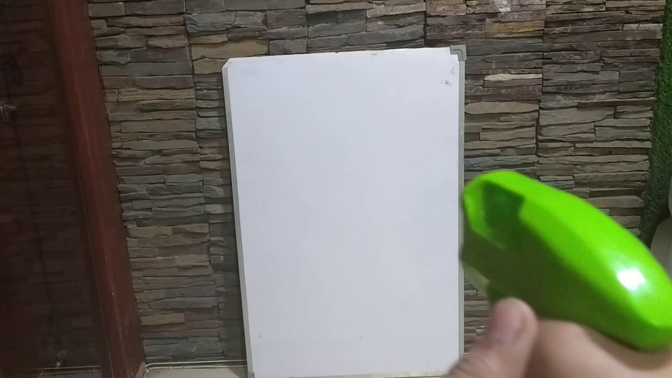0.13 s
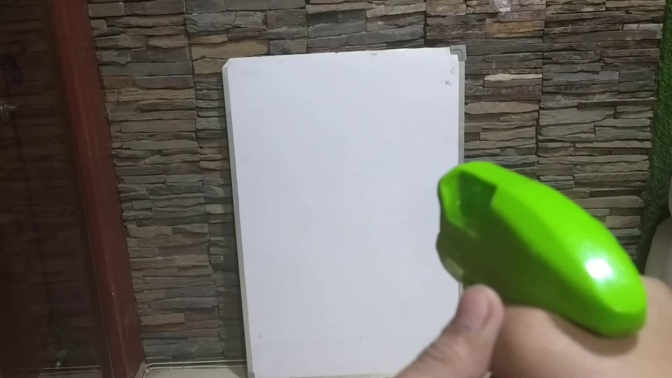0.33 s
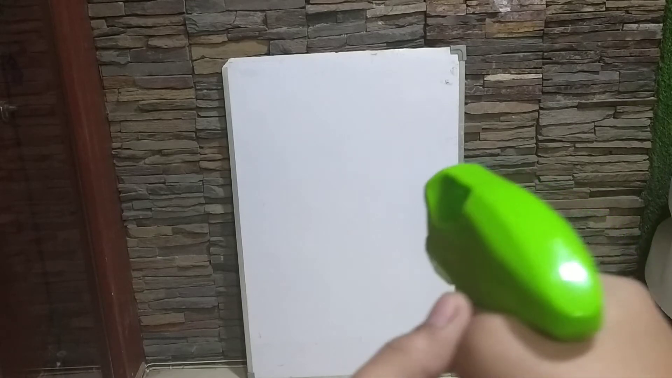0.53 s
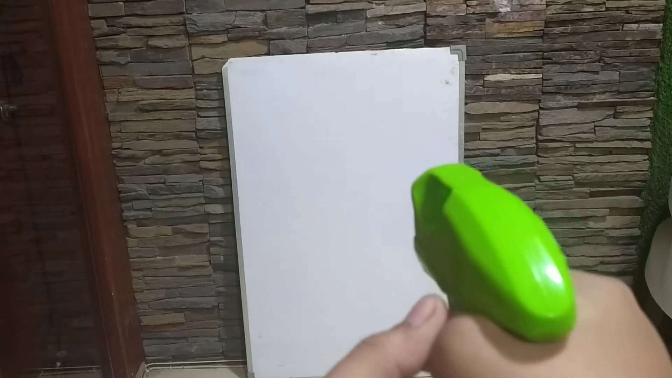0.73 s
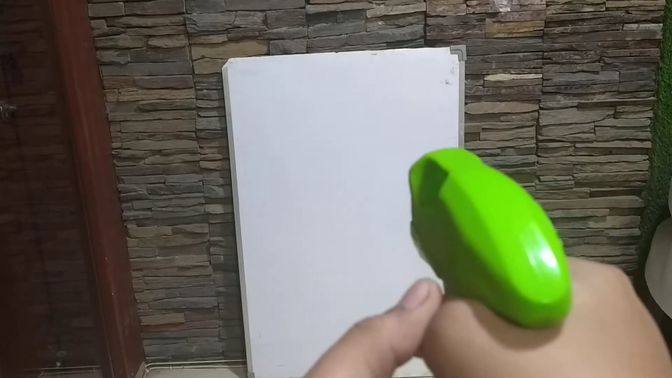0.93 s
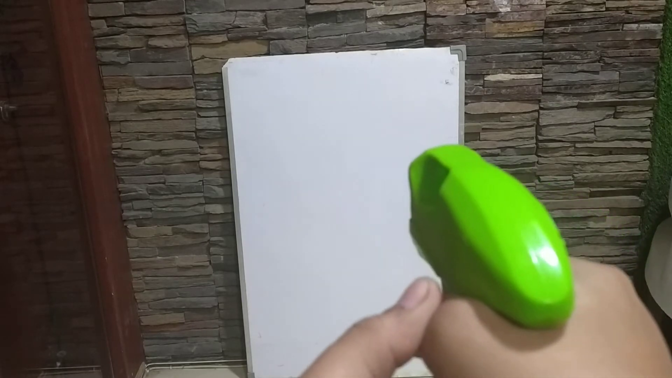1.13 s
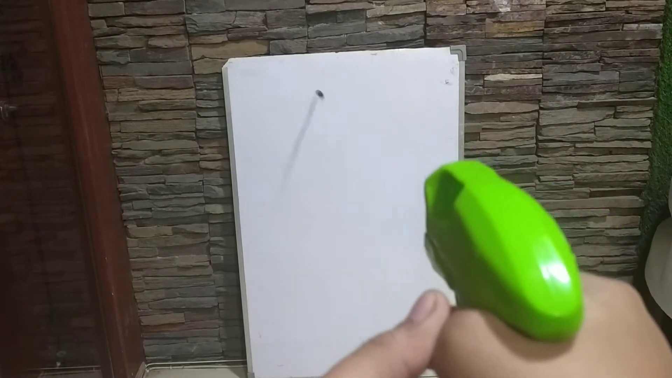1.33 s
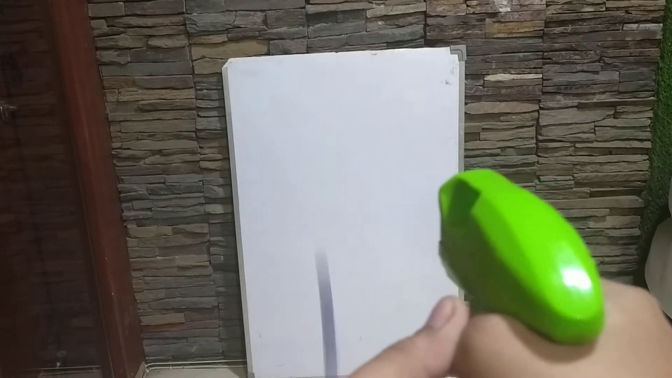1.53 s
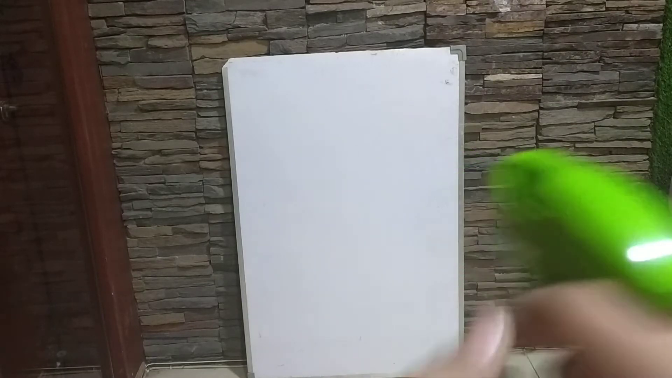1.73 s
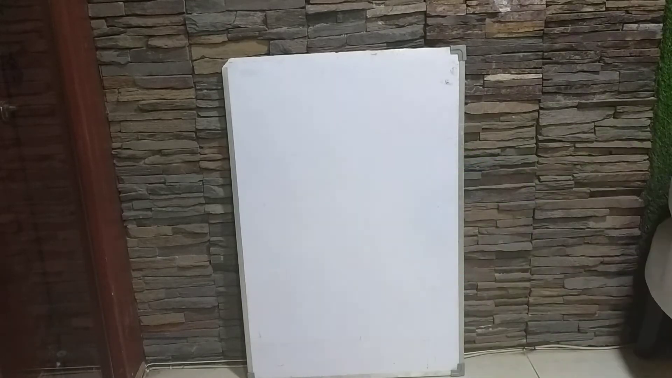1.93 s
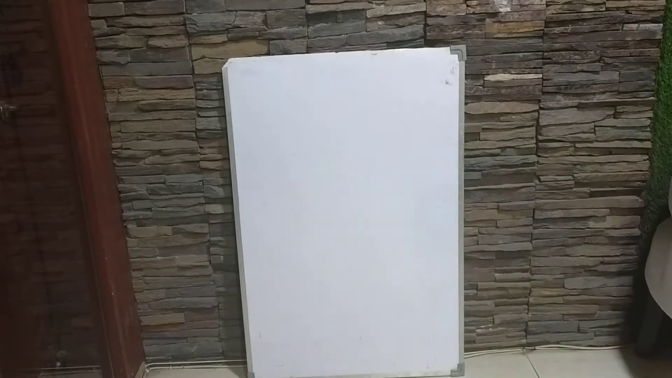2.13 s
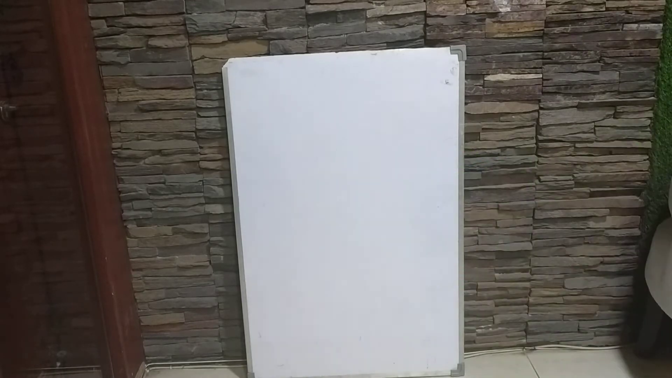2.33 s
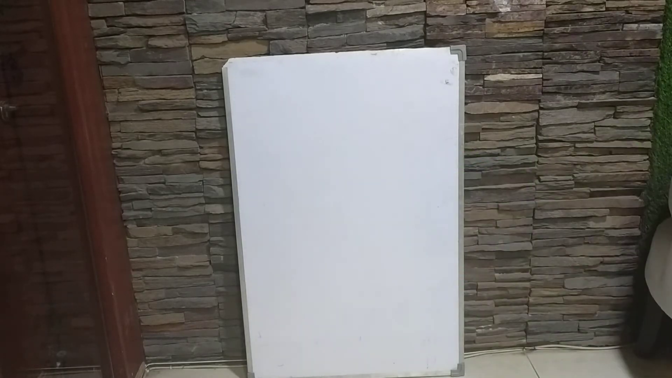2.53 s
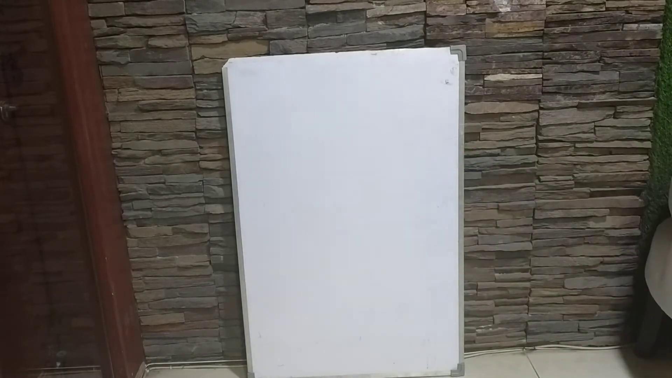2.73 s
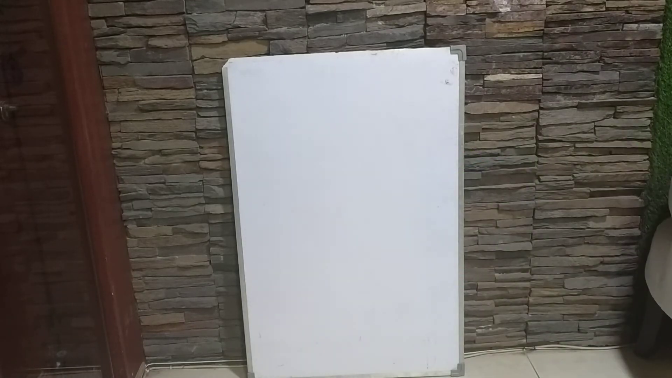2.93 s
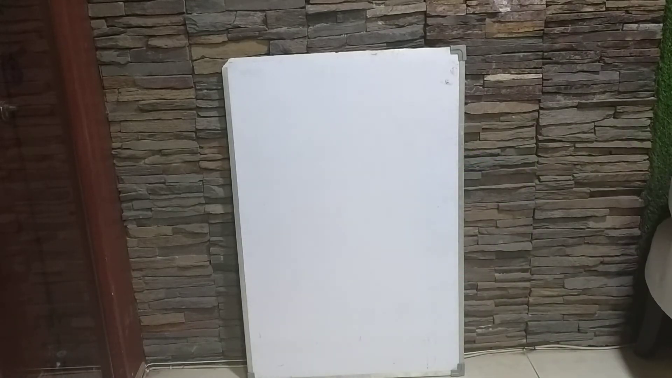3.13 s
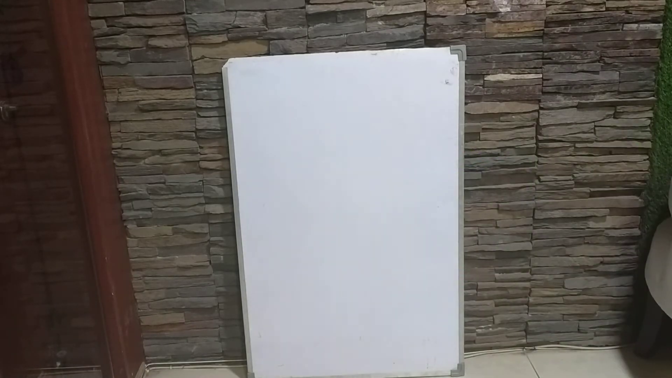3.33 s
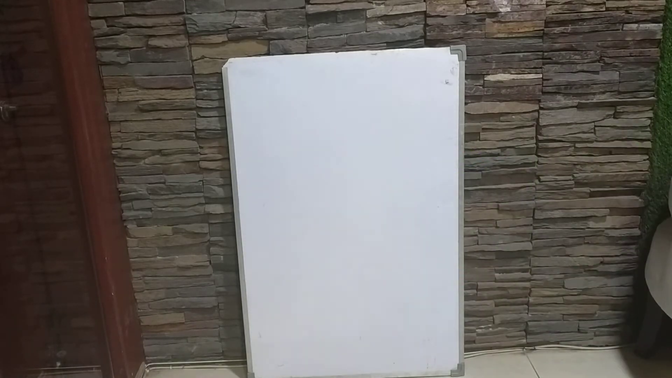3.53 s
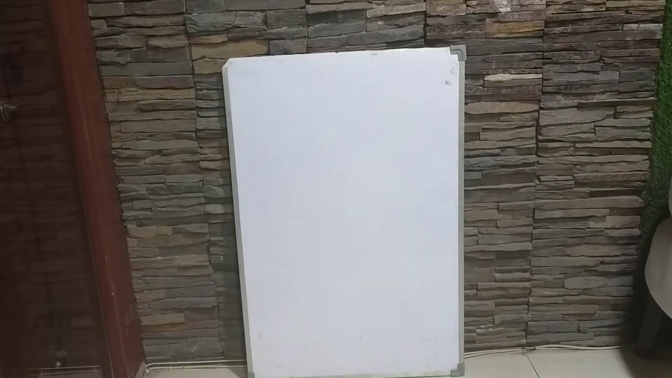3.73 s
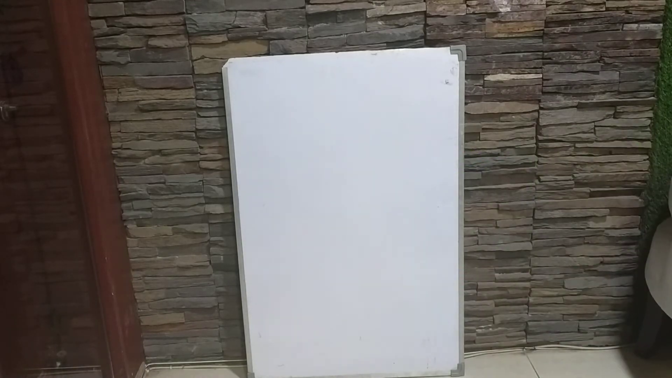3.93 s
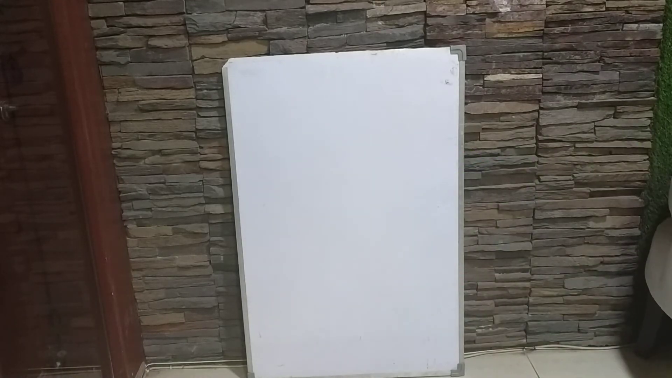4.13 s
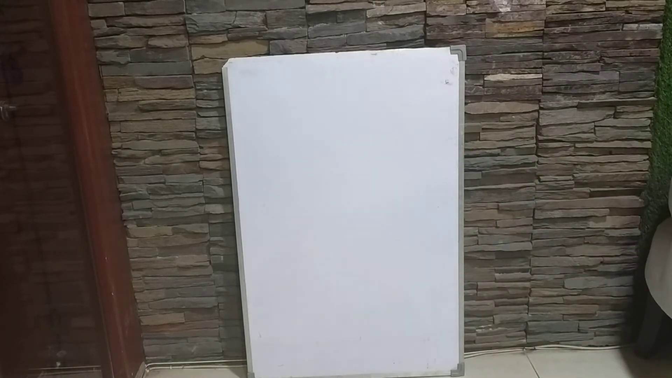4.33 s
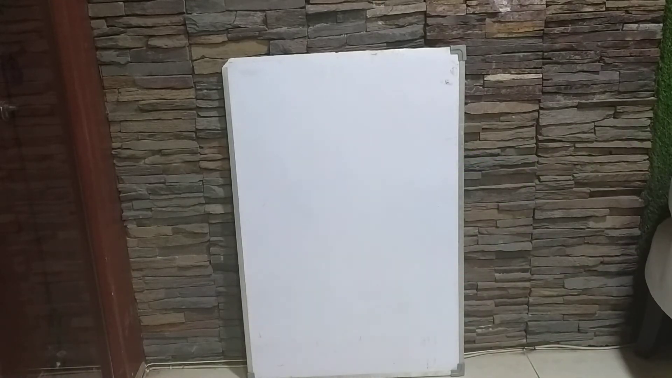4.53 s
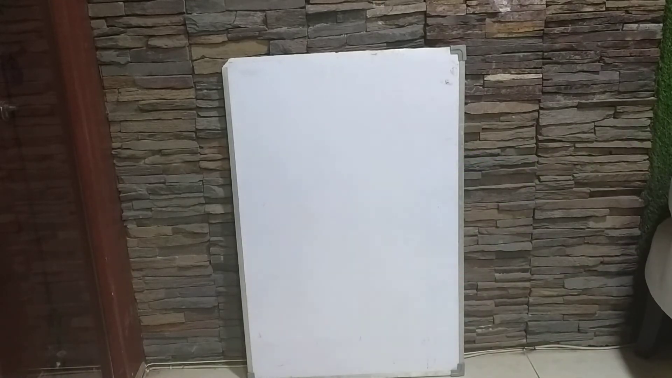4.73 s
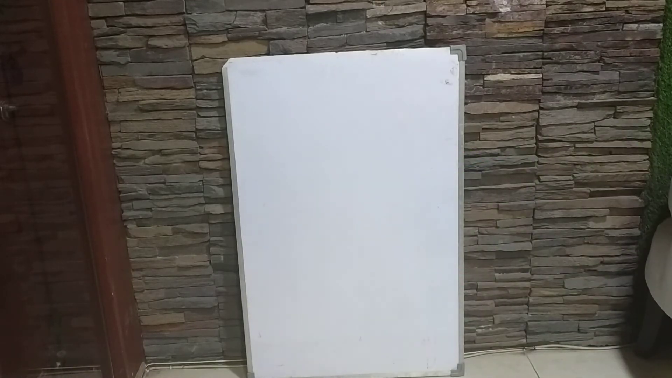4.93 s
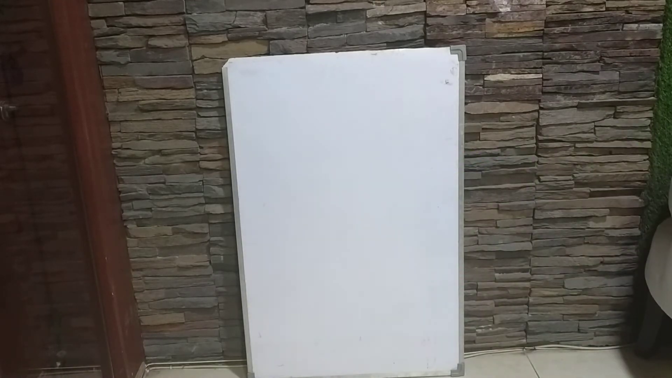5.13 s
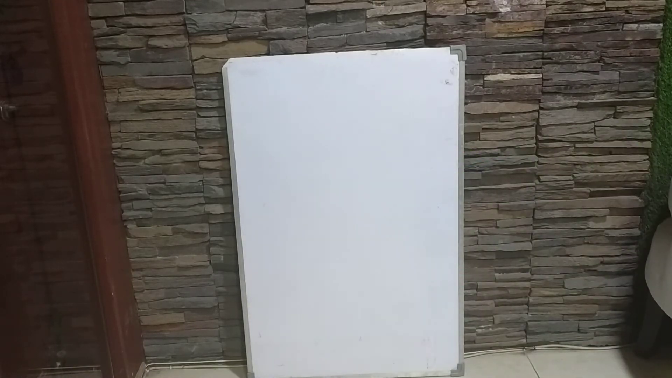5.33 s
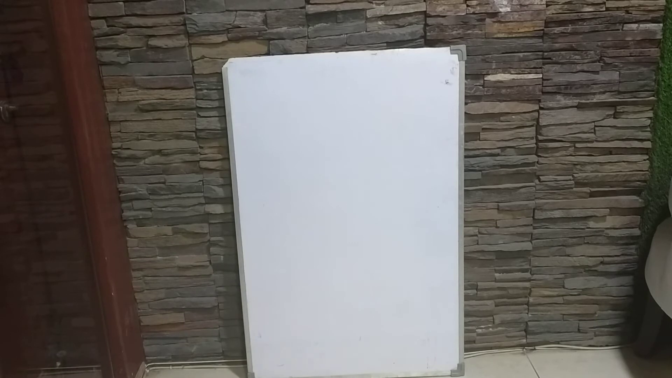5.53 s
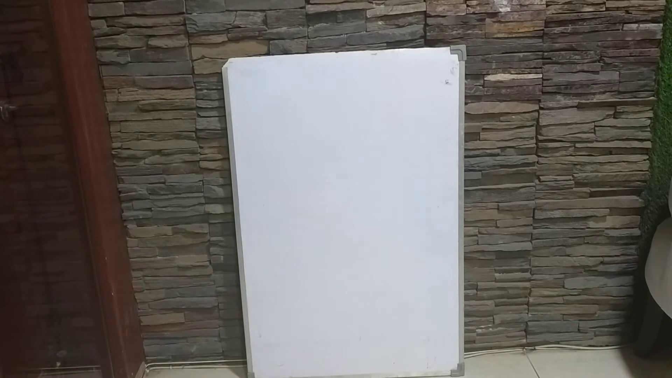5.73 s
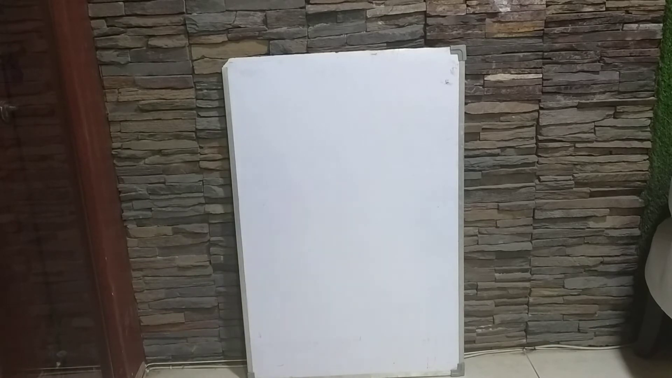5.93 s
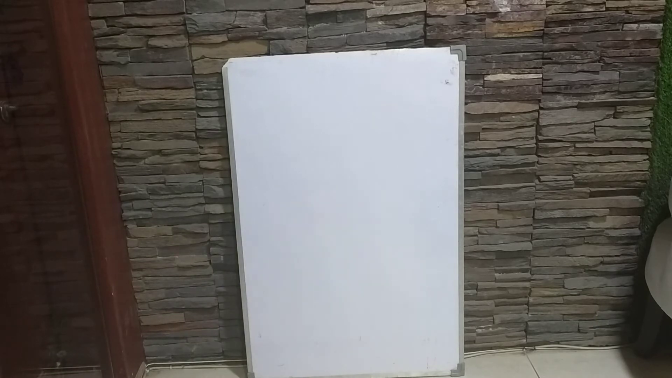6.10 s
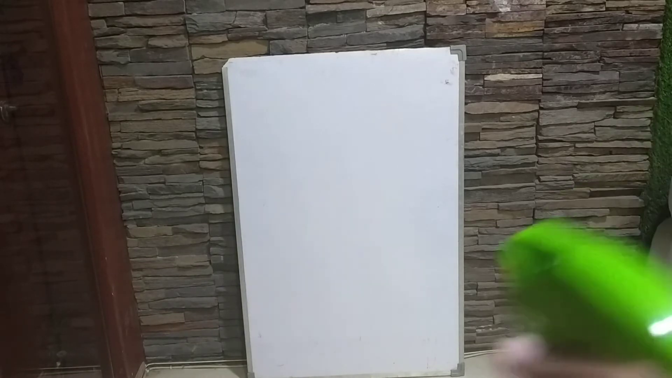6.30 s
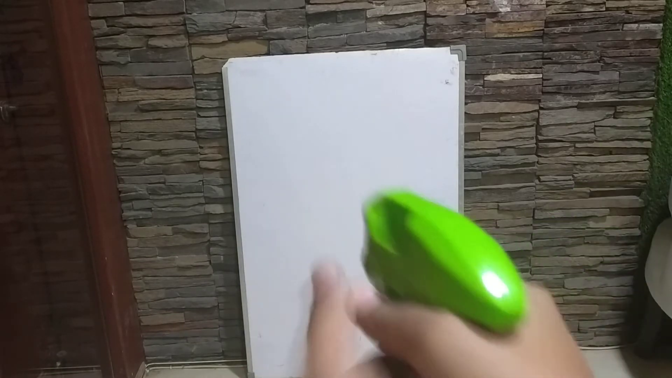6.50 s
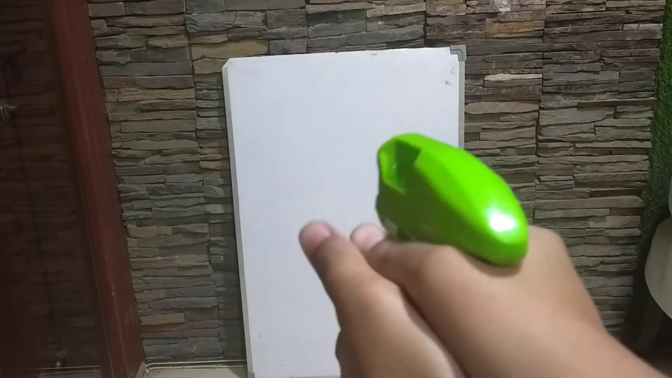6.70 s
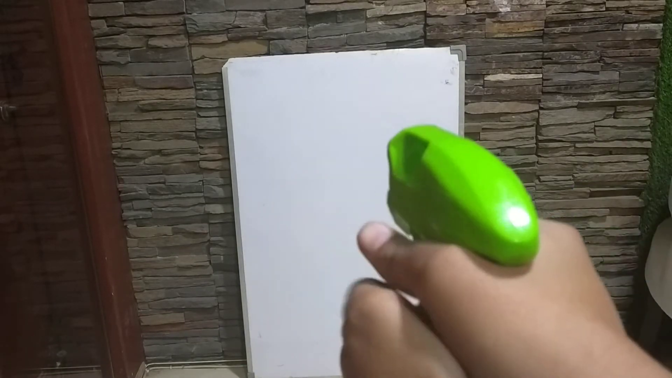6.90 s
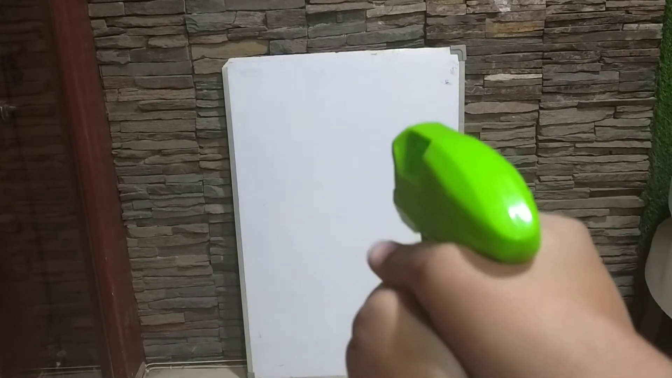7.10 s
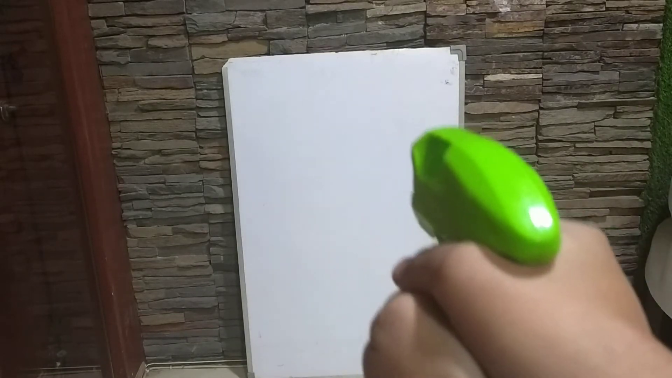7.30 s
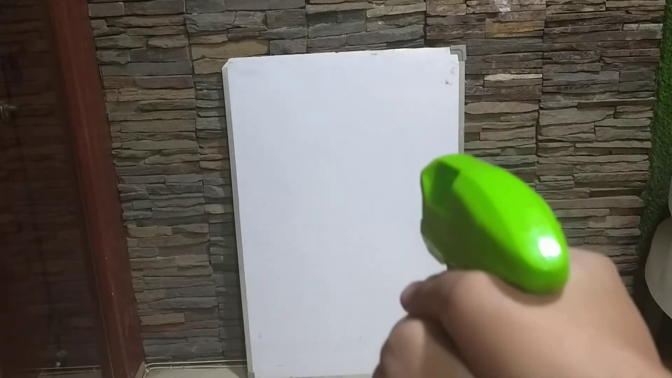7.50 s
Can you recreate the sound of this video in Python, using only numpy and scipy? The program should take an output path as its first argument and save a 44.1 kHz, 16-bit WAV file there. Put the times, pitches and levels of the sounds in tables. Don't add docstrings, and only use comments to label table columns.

```python
import sys
import numpy as np
from scipy import signal
from scipy.fft import rfft, irfft
from scipy.io import wavfile
from scipy.ndimage import map_coordinates

SR = 44100
rng = np.random.default_rng(int(sys.argv[2]) if len(sys.argv) > 2 else 0)


def natural_amplitude(level_db):
    exponent = np.asarray(level_db, float) / 20
    return 10 ** exponent


def dump(signal):
    limited = np.clip(np.atleast_2d(signal).T, -1, 1)
    pcm = np.round(limited * 32767).astype(np.int16)
    wavfile.write(sys.argv[1], SR, pcm)


N = 333396

# frequency in Hz, reverberation time (60 dB) in seconds.
ROOM_DECAY = [(100, .45), (400, .4), (1500, .5), (5000, 0.47), (10000, 0.355), (16000, .29)]
# frequency in Hz, likeness from 0 to 1.
DIFFUSE_LIKENESS = [(60, 0.99), (200, 0.9), (380, 0.85), (700, .85), (1300, 0.019), (8000, 0)]
DIRECT_LIKENESS = [(400, 1), (700, 0.34), (1300, .65), (4400, 0.38), (9000, .05)]

# time in seconds, strength in dB.
TRAFFIC_STRENGTH = [(0, 1.5), (.25, -2), (.7, 1), (2, 0), (2.4, -2.5), (3.5, -2.5), (4.1, 0), (5.1, -.5),
                    (6.15, 2.5), (6.5, 1), (7.56, .5)]
# frequency in Hz, density in dB per Hz.
RUMBLE_SPECTRUM = [(8.8, -33), (15, -2), (40, 3), (50, -3), (75, -15), (98, -44.5), (160, -120)]
DRONE_SPECTRUM = [(47, -28.5), (80, 3), (113, -6.5), (151, -3), (184, -16.5), (213, -11.5), (297, -11.5),
                  (535, -22), (598, -27.5), (701, -22.5), (746, -26), (1500, -38), (1950, -68.5),
                  (3300, -120)]
HISS_SPECTRUM = [(500, -31), (900, -7), (2000, -9), (4000, -11.5), (6500, -12.5), (9000, -8.5),
                 (11000, -10), (12600, -14.5), (13000, -40.5)]
RUMBLE_DB, DRONE_DB, HISS_DB = -65.5, -75.8, -84
DRONE_FOLLOWS = .9
# time in seconds, pitch in Hz, level in dB.
HUM_COURSE = [(0, 706, -99), (1.2, 711, -96), (4.2, 710, -98.5), (5.5, 717, -99), (5.75, 716, -86),
              (6.0, 718, -89), (6.12, 716, -84), (6.35, 717.6, -97.5), (7.56, 716, -102)]
# centre in Hz, bandwidth in Hz, level in dB.
MACHINE_BANDS = [(145, 14, -86.5), (216.8, 9, -90), (303, 8.7, -90)]

# peak in seconds, swell in seconds per 10 dB,
# fade in seconds per 10 dB, hiss level in dB, scrape over hiss in dB.
RUB_STROKES = [(1.88, .012, .16, -70.5, -4), (2.14, .15, .06, -74, -7), (2.264, .012, .05, -73, -9),
               (2.53, .3, .03, -76, -6), (2.76, .03, .08, -66, -13), (2.96, .05, .1, -67.5, -15),
               (3.01, .02, .095, -61, -7.5), (3.38, .1, .06, -76, -11), (3.7, .19, .24, -69.5, -3),
               (4.22, .5, .11, -75, -2.5), (4.36, .045, .065, -69.5, -19), (4.5, .055, .035, -74, -18),
               (4.635, .04, .075, -72, -18), (4.88, .14, .06, -81, -1), (5.0, .04, .025, -71, -14),
               (5.065, .03, .045, -64, -7), (5.105, .04, .05, -64.5, -6), (5.215, .04, .075, -67, -13),
               (5.44, .045, .45, -78, -9), (5.59, .018, .11, -71, -15), (5.815, .07, .13, -67.5, -22),
               (6.05, .2, .55, -78, -8), (6.51, .3, .17, -82, -9)]
# peak in seconds, swell and fade in seconds per 10 dB, level in dB.
CLOTH_STROKES = [
    (3.69, .025, .045, -70),
    (3.99, .07, .15, -76.5),
]
# frequency in Hz, density in dB per Hz.
SKIN_SPECTRUM = [(1500, -41.5), (2600, -16.5), (3500, -10.5), (6000, -8.5), (9300, -0.5), (11000, -5.5),
                 (13000, -11), (15500, -14), (16400, -45)]
SCRAPE_SPECTRUM = [(200, -31), (500, -8), (1000, -3.5), (1600, 1), (3000, -3), (6000, -19)]
CLOTH_SPECTRUM = [(60, -26), (110, -1.5), (220, -2), (600, -8), (1200, -22), (2500, -42.5)]
RUB_HOLD_S, CLOTH_HOLD_S = .012, .09
SCRAPE_SHORTER = .65

# start in seconds, peak of the bright crack in dB,
# peak of the dull knock in dB, knock frequency in Hz, left over right in dB.
BLUNT_TAPS = [(1.6730, -41, -55, 3800, -1.5), (1.8431, -43, -46, 494, 1.5), (1.8446, -47, -44.5, 1200, -1),
              (2.265, -52.5, -55, 600, -1), (2.493, -56, -60.5, 907, -1), (2.540, -56, -56, 600, 3),
              (2.5505, -35, -50, 1180, -2), (2.555, -28.5, -47, 1480, -1.5), (2.578, -37, -58, 2000, -3),
              (2.5974, -18, -57, 312, 1), (2.716, -75, -64.5, 254, -1), (2.9248, -40, -54, 2200, 2),
              (3.640, -70, -65, 220, 0), (4.363, -59, -80.5, 1500, 7), (5.042, -64, -72, 1480, -0.5),
              (5.2235, -44, -58, 3200, -0.5), (5.582, -63, -80, 2000, 8), (5.885, -59.5, -72, 3000, 5),
              (6.523, -61.5, -76, 2500, 7)]
# start in seconds, peak of the bright crack in dB,
# peak of the dull knock in dB, knock frequency in Hz, left over right in dB.
HOLLOW_CLICKS = [
    (2.347, -56.5, -67, 2500, 10),
    (2.461, -70, -65.5, 2400, -2),
    (2.5984, -22, -42, 2540, -1.5),
    (2.713, -59, -56, 1300, -1),
    (3.001, -53.5, -52.5, 4370, -2),
    (4.625, -59, -69, 1050, 1),
    (4.876, -65, -73, 970, 0),
    (5.464, -62, -77, 1074, 0),
    (6.497, -73.5, -72, 1490, -4),
]
# start in seconds, peak of the bright crack in dB,
# peak of the dull knock in dB, knock frequency in Hz, left over right in dB.
HOUSING_PINGS = [
    (3.017, -57.5, -55, 1490, -8),
    (3.08, -70, -75, 1500, 0),
]
TAP_Q, CLICK_Q, PING_Q = 1.2, 4.2, 9.5
# frequency in Hz, density in dB per Hz.
CONTACT_SPECTRUM = [(600, -44), (1200, -19), (2500, -17.5), (4000, -10.5), (6000, -11.5), (9300, 0.5),
                    (11500, -6.5), (15500, -16), (16400, -39.5)]

# start in seconds, peak in dB, decay (60 dB) in seconds,
# left over right in dB.
DART_SLAPS = [
    (1.3423, -6.5, .002, -0.5),
    (1.3434, -9.5, .002, -10.5),
    (1.3437, -14, .004, 5.5),
    (1.3447, -13, 0.001, -2.5),
    (1.3455, -13, .004, -7),
    (1.3524, -17, .004, 0),
    (1.3529, -14, .006, 3.5),
]
# start in seconds, level in dB.
BOARD_BLOWS = [
    (1.3425, -28),
    (1.3527, -35.5),
    (1.3657, -35),
]
# frequency in Hz, level in dB, decay (60 dB) in seconds.
BOARD_MODES = [(278, -4.5, .16), (341, 2, 0.1), (400, -6, 0.056), (490, -0.5, .14), (590, -3.5, 0.088),
               (690, -3, 0.095), (830, -5, 0.13), (972, -9, 0.078), (1173, -13.5, .06)]
# frequency in Hz, density in dB per Hz.
SLAP_SPECTRUM = [(150, -29.5), (500, -6), (1500, -10), (3000, -11), (4500, -13.5), (6200, -6.5), (9000, 0),
                 (11000, -4), (13000, -14), (15500, -17), (16300, -41)]

# start in seconds, peak in dB, decay (60 dB) in seconds, left over right in dB.
SHOT_CRACKS = [
    (1.2367, -14, .05, 0),
    (1.2441, -12, .02, 1),
    (1.2482, -13, .025, 2),
    (1.2497, -14, .025, 1),
    (1.2522, -16, .03, 0),
    (1.2550, -17, .02, 0),
    (1.2585, -18, .03, 0),
]
# start in seconds, level in dB.
BODY_RINGS = [
    (1.2438, -6),
    (1.2536, -22),
    (1.2661, -28),
]
# start in seconds, level in dB.
AIR_PUFFS = [
    (1.2378, -23),
]
# frequency in Hz, level in dB, decay (60 dB) in seconds.
BODY_MODES = [(778, 0, 0.02), (1130, -8.5, .022), (365, -21, .05), (1358.5, -11.5, .025), (2520, -16, .035),
              (2700, -17, .03)]
BARREL_MODES = [(178, -1.5, 0.05), (120, -5, .05)]
# frequency in Hz, density in dB per Hz.
SHOT_SPECTRUM = [(120, -26), (350, -18), (800, -9), (1200, -9), (1700, -7.5), (2600, -5), (3600, -4),
                 (5300, -6.5), (8500, -1.5), (10500, -1.5), (12500, -8), (15500, -10), (16300, -40.5)]
# peak in seconds, swell and fade in seconds per 10 dB, level in dB.
SPRING_RING = (1.55, .05, .27, -72.5)
SPRING_HZ = 1513
DAMPED_S, DAMPING_DB_PER_S = 1.76, 170


def unit(x):
    return x / np.sqrt(np.mean(x ** 2) + 1e-20)


def along(points, hz):
    f, v = np.transpose(points)
    return np.interp(np.log(hz + 1), np.log(f + 1), v)


def curves(rows):
    s, *columns = np.transpose(rows)
    return [np.interp(np.arange(N) / SR, s, column) for column in columns]


def wobble(rate):
    knots = rng.standard_normal(int(N * rate / SR) + 4)
    return map_coordinates(knots, [np.arange(N) * rate / SR])


def stroke(peak_s, swell_s, fade_s, db, hold_s=0):
    t = np.arange(N) / SR - peak_s
    before = (-t - hold_s / 2) / swell_s
    after = (t - hold_s / 2) / fade_s
    return natural_amplitude(db - 10 * np.maximum(0, np.maximum(before, after)))


def diffuse(spectrum, size, alike=DIFFUSE_LIKENESS):
    hz = np.fft.rfftfreq(size, 1 / SR)
    turn = np.arccos(np.clip(along(alike, hz), -1, 1)) / 2
    noise = rfft(rng.standard_normal((2, size))) * natural_amplitude(along(spectrum, hz))
    mid, side = irfft(noise * [np.cos(turn), np.sin(turn)], size)
    return unit(np.array([mid + side, mid - side]))


def add(track, s, sound):
    track[:, round(s * SR):][:, :sound.shape[-1]] += sound


def tail(spectrum):
    hz, t, z = signal.stft(diffuse(spectrum, size=SR), SR, nperseg=256)
    decay = natural_amplitude(-60 * t / along(ROOM_DECAY, hz)[:, None])
    echoes = signal.istft(z * decay, SR, nperseg=256)[1][:, :SR]
    echoes = echoes * np.clip(np.arange(SR) / SR / 0.0013, 0, 1)
    return echoes / np.linalg.norm(echoes[0])


def in_room(sound, wet_db):
    answer = natural_amplitude(wet_db) * signal.fftconvolve(sound[:1], tail([(20, 0)]), axes=1)[:, :SR]
    add(answer, 0, sound)
    return answer


def crack(spectrum, db, t60, pan_db, wet_db):
    t = np.arange(SR // 8) / SR
    burst = diffuse(spectrum, size=len(t), alike=DIRECT_LIKENESS) * natural_amplitude(-60 * t / t60)
    burst = burst * (1 + 0.72 * np.exp(-t / 0.00074))
    burst = natural_amplitude(db) * burst / np.abs(burst).max()
    answer = natural_amplitude(wet_db) * np.linalg.norm(burst[0]) * tail(spectrum)
    add(answer, 0, burst * natural_amplitude([[pan_db / 2], [-pan_db / 2]]))
    return answer


def ring(modes, db, attack):
    t = np.arange(SR // 2) / SR
    tones = np.zeros(len(t))
    for k, (hz, level, t60) in enumerate(modes):
        tones += (-1) ** k * natural_amplitude(level - 60 * t / t60) * np.sin(2 * np.pi * hz * t)
    return natural_amplitude(db) * tones * (1 - np.exp(-t / attack)) * np.ones((2, 1))


def struck(cracks, spectrum, blows, modes, attack, crack_wet_db, ring_wet_db):
    out = np.zeros((2, N + SR))
    for s, db, t60, pan_db in cracks:
        add(out, s, crack(spectrum, db, t60, pan_db, crack_wet_db))
    for s, db in blows:
        add(out, s, in_room(ring(modes, db, attack), ring_wet_db))
    return out


def background():
    strength_db, = curves(TRAFFIC_STRENGTH)
    rumble = natural_amplitude(RUMBLE_DB + strength_db) * diffuse(RUMBLE_SPECTRUM, size=N)
    drone_db = DRONE_DB + DRONE_FOLLOWS * strength_db + 1.2 * wobble(5)
    drone = natural_amplitude(drone_db) * diffuse(DRONE_SPECTRUM, size=N)
    hz, hum_db = curves(HUM_COURSE)
    hum = natural_amplitude(hum_db + 0.76 * wobble(22)) * np.sin(2 * np.pi * np.cumsum(hz) / SR)
    return rumble + drone + hum + natural_amplitude(HISS_DB) * diffuse(HISS_SPECTRUM, size=N)


def machinery():
    out = np.zeros((2, N))
    for hz, width_hz, db in MACHINE_BANDS:
        band = [(hz - 2 * width_hz, -60), (hz - width_hz / 2, -3), (hz, 0),
                (hz + width_hz / 2, -3), (hz + 2 * width_hz, -60)]
        out += natural_amplitude(db + 1.8 * wobble(1.5)) * diffuse(band, size=N)
    return natural_amplitude(1.3 * curves(TRAFFIC_STRENGTH)[0]) * out


def rubbing():
    hiss_power, scrape_power = np.zeros(N), np.zeros(N)
    for s, swell_s, fade_s, db, over_db in RUB_STROKES:
        hiss_power += stroke(s, swell_s, fade_s, db, RUB_HOLD_S) ** 2
        swell_s, fade_s = SCRAPE_SHORTER * swell_s, SCRAPE_SHORTER * fade_s
        scrape_power += stroke(s, swell_s, fade_s, db + over_db, RUB_HOLD_S) ** 2
    rough_hiss = unit(natural_amplitude(1.5 * wobble(150)) * diffuse(SKIN_SPECTRUM, size=N))
    rough_scrape = unit(natural_amplitude(3.3 * wobble(90)) * diffuse(SCRAPE_SPECTRUM, size=N))
    cloth_gain = sum(stroke(*row, CLOTH_HOLD_S) for row in CLOTH_STROKES)
    cloth = cloth_gain * diffuse(CLOTH_SPECTRUM, size=N)
    return cloth + np.sqrt(hiss_power) * natural_amplitude(2.1) * rough_hiss + np.sqrt(scrape_power) * rough_scrape


def ticks():
    out = np.zeros((2, N + SR))
    f = np.geomspace(60, 12000, num=80)
    for contacts, q in [(BLUNT_TAPS, TAP_Q), (HOLLOW_CLICKS, CLICK_Q), (HOUSING_PINGS, PING_Q)]:
        for s, bright_db, dull_db, hz, pan_db in contacts:
            detuning = (hz * hz - f * f) / (f * hz)
            resonance = np.transpose([f, -20 * np.log10(1 + (q * detuning) ** 2)])
            add(out, s, crack(CONTACT_SPECTRUM, bright_db + 2.5, 0.014, pan_db, wet_db=.3))
            add(out, s, crack(resonance, dull_db + 1, 0.032, pan_db, wet_db=-3.2))
            add(out, s, ring([(hz, 0, 4 * q / hz)], dull_db + 3.5, attack=0.00048))
    return out


def board():
    return struck(DART_SLAPS, SLAP_SPECTRUM, BOARD_BLOWS, BOARD_MODES,
                  attack=0.0019, crack_wet_db=4.2, ring_wet_db=-8.5)


def spring():
    t = np.arange(N) / SR
    damping = natural_amplitude(-DAMPING_DB_PER_S * np.maximum(t - DAMPED_S, 0))
    return natural_amplitude(4.5) * stroke(*SPRING_RING) * damping * np.sin(2 * np.pi * SPRING_HZ * t)


def blaster():
    out = struck(SHOT_CRACKS, SHOT_SPECTRUM, BODY_RINGS, BODY_MODES,
                 attack=.001, crack_wet_db=-4, ring_wet_db=-10.5)
    for s, db in AIR_PUFFS:
        add(out, s, in_room(ring(BARREL_MODES, db, attack=0.003), wet_db=-10))
    add(out, 0, spring()[None])
    return out


def scene():
    impacts = (board() + ticks() + blaster())[:, :N]
    return background() + machinery() + rubbing() + impacts


def low_pass(x):
    return signal.sosfilt(signal.butter(12, 16350, fs=SR, output="sos"), x)


def record(dry):
    lowpass = signal.butter(10, 16200, fs=SR, output='sos')
    mix = signal.sosfiltfilt(lowpass, dry)
    return low_pass(mix)


dry = scene()
out = record(dry)
dump(out)
```